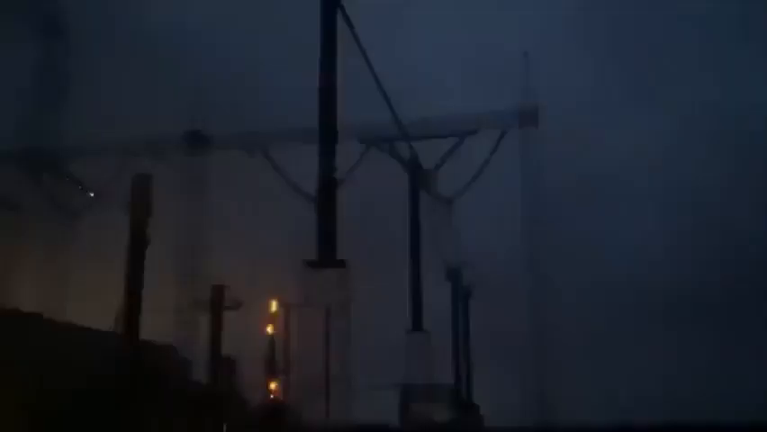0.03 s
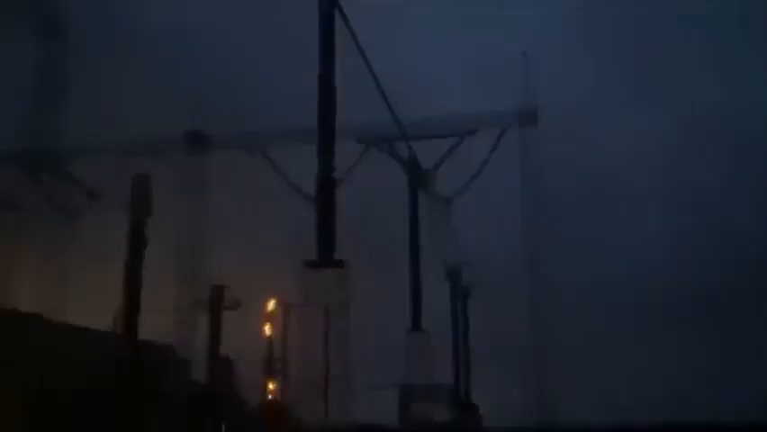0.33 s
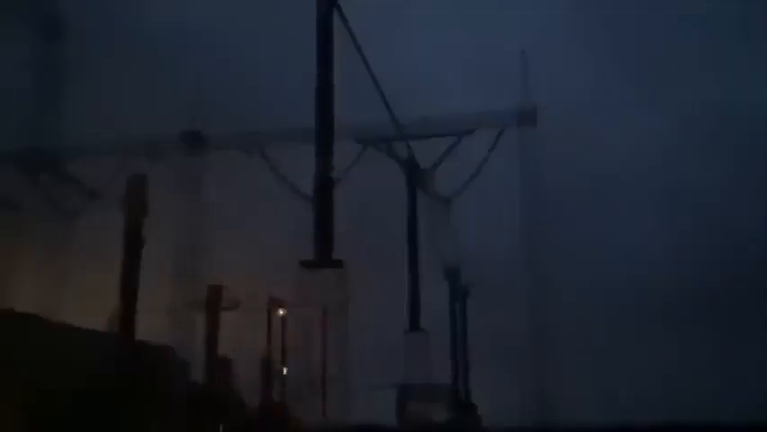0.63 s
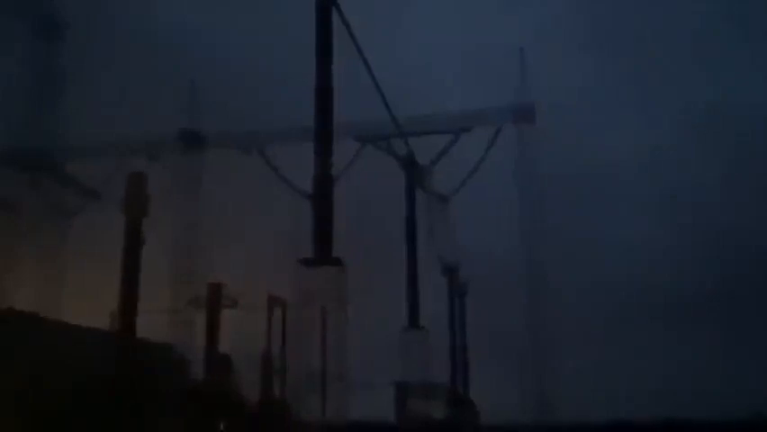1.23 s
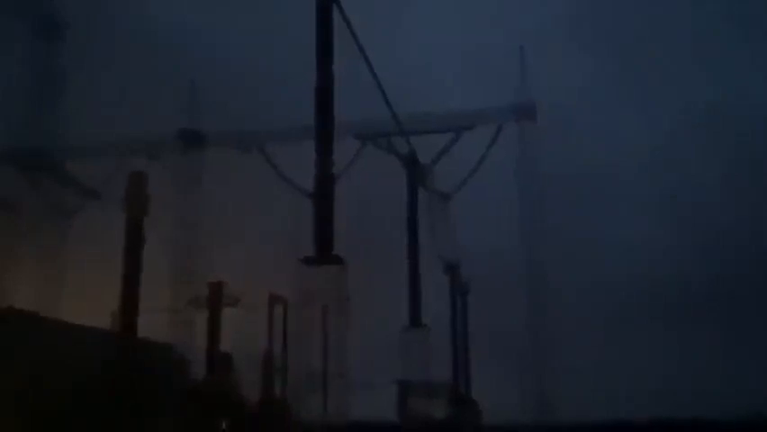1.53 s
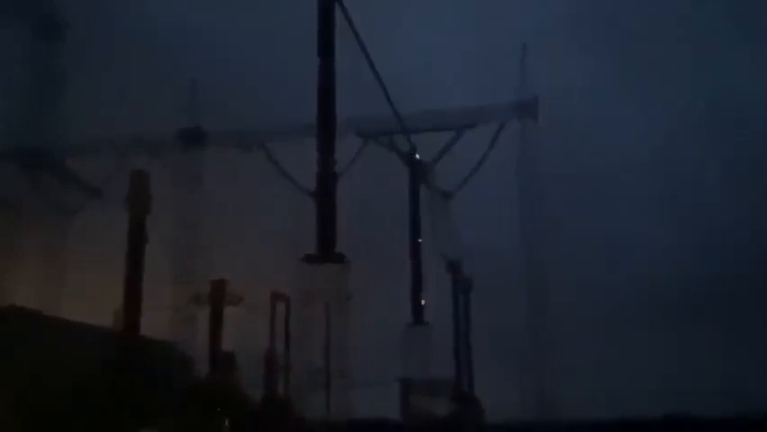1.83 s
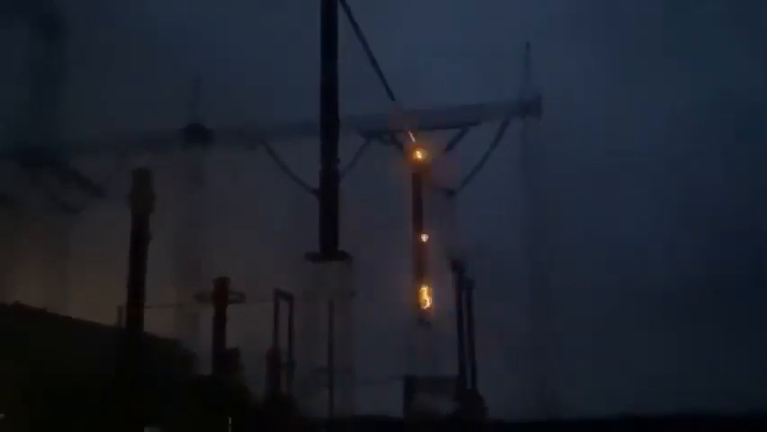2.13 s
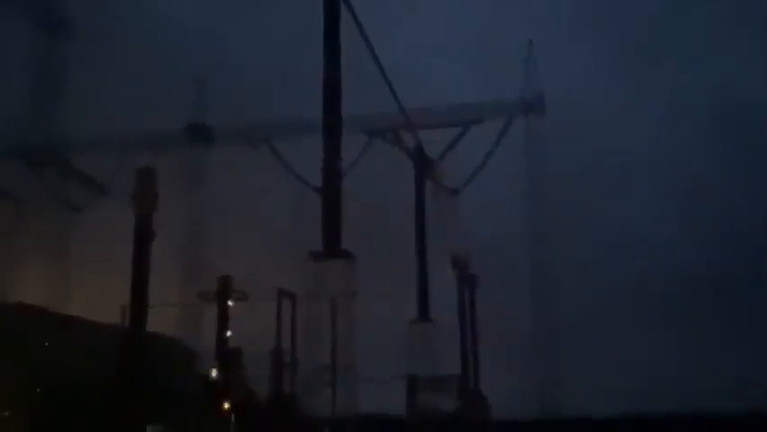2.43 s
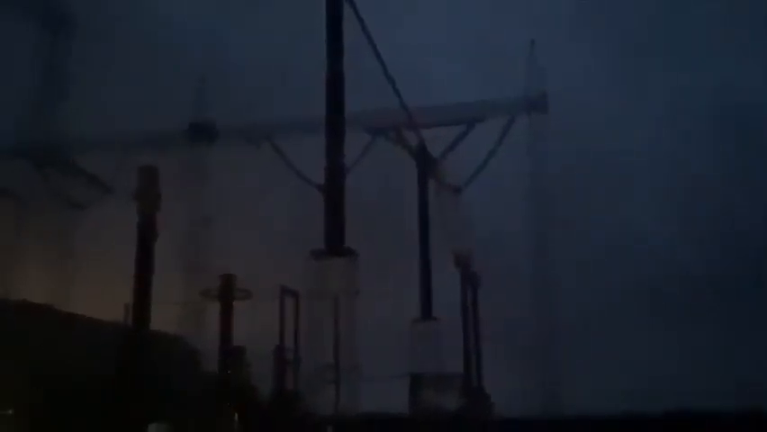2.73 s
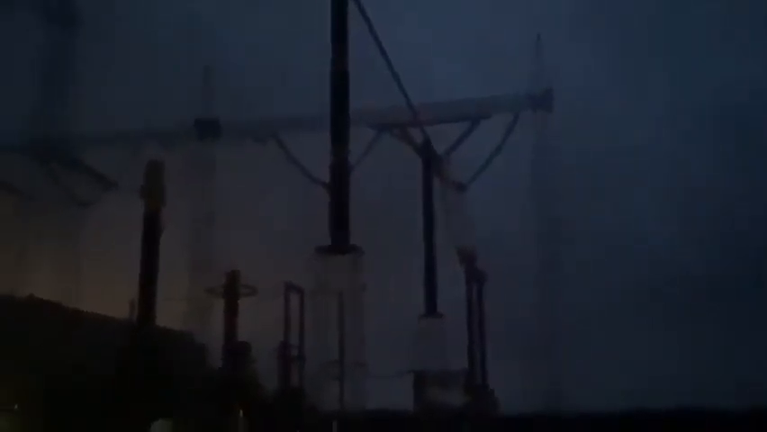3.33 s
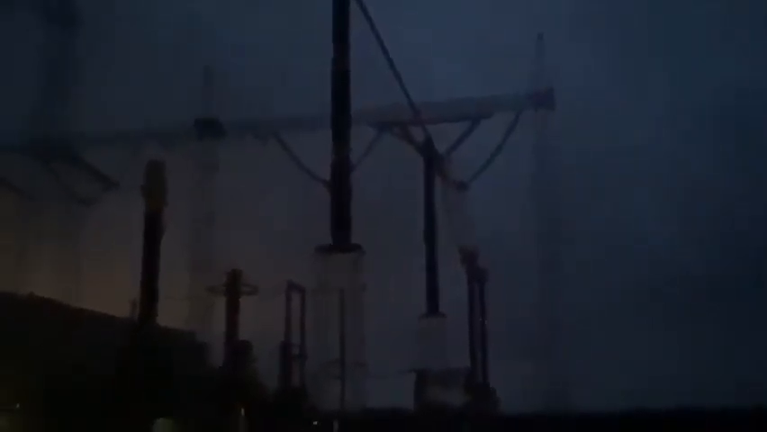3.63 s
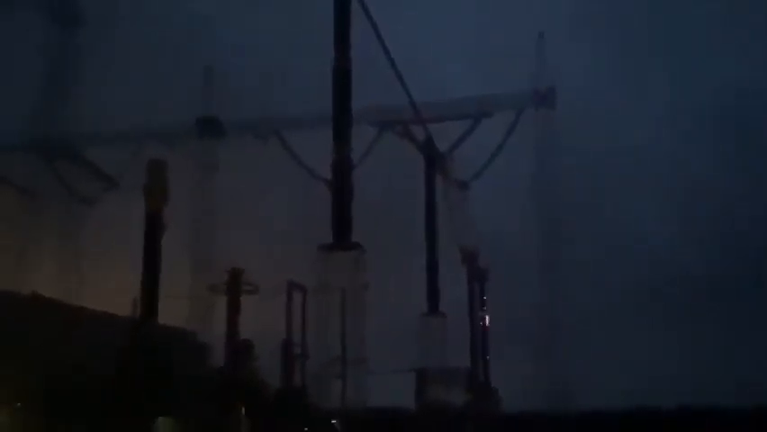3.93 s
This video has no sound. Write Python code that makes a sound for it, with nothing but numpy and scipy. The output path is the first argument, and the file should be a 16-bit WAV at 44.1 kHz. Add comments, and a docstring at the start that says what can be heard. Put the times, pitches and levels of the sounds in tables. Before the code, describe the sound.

High-voltage insulators sizzle and tick while transformers hum and the night air rumbles.

```python
"""Electrical discharges sizzle, tick and spit on the insulators of a high-voltage switchyard at night.
Each spark is an impulse: crowds of them merge into hiss, and quick runs set the fittings ringing.
Beneath them are the hum of transformers and cooling fans, a low rumble, a drone and distant traffic.
An instant of brighter, wider hiss comes first and breaks off; after a short silence the yard fades in."""
import sys
import numpy as np
from scipy import signal
from scipy.fft import rfft, irfft
from scipy.io import wavfile

SR = 44100
rng = np.random.default_rng(int(sys.argv[2]) if len(sys.argv) > 2 else 0)


def waveform_to_disk(signal):
    """Save audio, clipped to [-1, 1], as 16-bit WAV at the path in sys.argv[1]."""
    frames = np.transpose(np.atleast_2d(signal))
    scaled = np.clip(frames, -1, 1) * 32767
    samples = np.round(scaled).astype(np.int16)
    wavfile.write(sys.argv[1], SR, samples)


N = 176400
T = np.arange(N) / SR
HZ = np.fft.rfftfreq(N, 1 / SR)

# Envelope of the sizzle and ticks. Each row: time in seconds, relative level in dB.
SIZZLE_LEVEL = [(.15, -46.5), (.49, -46), (.53, -44.5), (.57, -47), (.93, -47.5), (1.15, -46), (1.46, -46),
                (1.52, -46), (1.97, -47), (2.1, -47.5), (2.23, -45), (2.31, -45.5), (2.34, -44),
                (2.37, -43.5), (2.4, -47.5), (2.5, -45.5), (3.1, -47.5), (3.36, -45.5), (3.47, -46.5),
                (3.57, -49), (3.65, -46), (4.0, -47)]


def amp(db):
    """Amplitude ratio: tenfold for every 20 dB."""
    return 10 ** (np.asarray(db) / 20)


def unit(x):
    """Normalisation to an rms of 1."""
    return x / np.sqrt(np.mean(abs(x) ** 2) + 1e-20)


def over_frequency(points):
    """Interpolation of (Hz, value) points over log frequency."""
    hz, value = np.transpose(points)
    return np.interp(np.log(HZ + 1), np.log(hz + 1), value)


def envelope(points):
    """Amplitude envelope through (seconds, dB) points."""
    return amp(np.interp(T, *np.transpose(points)))


def colour(x, spectrum):
    """Minimum-phase filtering: a causal response of unit power gain, shaped by (Hz, dB) points."""
    log_gain = np.log(unit(amp(over_frequency(spectrum))))
    cepstrum = irfft(log_gain, N)
    cepstrum[1:N // 2] *= 2
    cepstrum[N // 2 + 1:] = 0
    return irfft(rfft(x) * np.exp(rfft(cepstrum)), N)


def drift(rate_hz):
    """Random modulation: low-passed noise of rms 1."""
    return unit(irfft(rfft(rng.standard_normal(N)) * np.exp(-(HZ / rate_hz) ** 2), N))


def spread(pair, coherence):
    """Partial coherence: two independent signals mix into left and right; coherence is capped at 1."""
    same = np.clip(over_frequency(coherence), -1, 1)
    mid, side = rfft(pair) * np.sqrt([(1 + same) / 2, (1 - same) / 2])
    return irfft(np.array([mid + side, mid - side]), N)


def stereo_noise(coherence):
    """Partially coherent white noise, from (Hz, coherence) points."""
    return spread(rng.standard_normal((2, N)), coherence)


def low_pass(x, hz):
    """Steep band limiting by a windowed sinc."""
    kernel = signal.firwin(401, hz, window=("kaiser", 9), fs=SR)
    return signal.oaconvolve(x, kernel[None], "same")


def resonate(x, hz, width_hz):
    """A damped resonance of peak gain 1: the narrower, the longer it rings."""
    return signal.lfilter(*signal.iirpeak(hz, hz / width_hz, fs=SR), x)


def traffic():
    """Interchannel level and phase differences set distant traffic to one side; its tyre whine nears."""
    # Spectra of the wash and the whine. Each row: frequency in Hz, relative density in dB.
    wash_spectrum = [(150, -29.5), (300, -10), (430, 0.5), (580, -2.5), (750, -7), (950, -10), (1500, -9.5),
                     (1850, -15.5), (2200, -41), (4000, -67.5)]
    whine_spectrum = [(300, -59), (500, -32), (620, -5), (720, -12), (770, 1), (820, -9), (920, -15),
                      (1150, -35), (2000, -80)]
    # Their envelopes. Each row: time in seconds, relative level in dB.
    wash_level = [(.15, 0.35), (1.3, 0.033), (2.2, 0.62), (3, 0.17), (3.8, 0.88), (4, 1.1)]
    whine_level = [(0, -84), (1.5, -80), (2.7, -60), (3.3, -58.5), (3.8, -53.5), (4, -54.5)]
    # Stereo image. Each row: frequency in Hz, then coherence, left lead in radians or left excess in dB.
    coherence = [(300, 1.2), (500, 0.5), (720, 0.05), (950, 0.67), (1250, 1.3), (1800, 0.5)]
    left_lead = [(300, -0.4), (500, -1.35), (700, -3), (1000, -4), (1800, -4)]
    left_excess = [(250, 28), (450, 4), (750, 2.5), (1200, 0), (2000, -4.5)]
    pan = amp(over_frequency(left_excess) / 2) * np.exp(.5j * over_frequency(left_lead))
    placed = irfft(rfft(stereo_noise(coherence)) * np.array([pan, 1 / pan]), N)
    wash = unit(colour(placed, wash_spectrum))
    whine = unit(colour(stereo_noise(coherence), whine_spectrum))
    return amp(-47) * envelope(wash_level) * wash + envelope(whine_level) * whine


def low_noise(spectrum, left_lag_s=0.000474):
    """Path difference: deep noise from the right reaches the left a moment later."""
    # Likeness of left and right. Each row: frequency in Hz, coherence.
    coherence = [(20, 0.94), (45, 1), (75, 1), (140, 0.99), (220, 0.99), (340, 0.99), (600, 0.27)]
    bins = rfft(stereo_noise(coherence))
    bins[0] *= np.exp(-2j * np.pi * HZ * left_lag_s)
    return unit(colour(irfft(bins, N), spectrum))


def rumble(buffet_s=0.017):
    """Amplitude modulation of deep noise: an outdoor rumble swells and sinks, with short buffets."""
    # Rumble spectrum. Each row: frequency in Hz, relative density in dB.
    spectrum = [(15, -26.5), (24, -26), (36, -11), (50, -1.5), (70, 2), (90, -1.5), (125, -6.5), (165, -9),
                (230, -17), (310, -22.5), (360, -26), (500, -36), (900, -55.5), (2000, -83.5)]
    # Slow swell and brief buffets. Each row: time in seconds, gain in dB.
    swell = [(.15, -2), (.23, -1.5), (.33, 1), (.5, 0), (.7, 1.5), (1.2, 1.1), (1.6, -2.5), (1.92, -1.5),
             (2.15, 0), (2.45, -4), (2.58, 0), (3.1, -0.6), (3.8, 1.5)]
    buffets = [(.267, 4), (.372, 3.5), (.75, 3), (1.728, 7), (1.917, 4.5), (2.565, 5), (2.917, 6.5)]
    rise_db = sum(db * np.exp(-((T - s) / buffet_s) ** 2) for s, db in buffets)
    return amp(-30 + rise_db) * envelope(swell) * low_noise(spectrum)


def drone(give=2.2):
    """Envelope compression steadies a low band of noise into a drone; less give holds it firmer."""
    # Drone spectrum. Each row: frequency in Hz, relative density in dB.
    spectrum = [(50, -59.5), (80, -35.5), (100, -8), (112, 2.5), (128, 7), (145, -2), (170, -11),
                (220, -32), (400, -70), (900, -110)]
    # Its swell, greatest about halfway. Each row: time in seconds, level in dB.
    level = [(.15, -43), (.8, -42.5), (1.4, -41.5), (1.7, -38), (1.9, -39), (2.1, -33.5), (2.55, -37.5),
             (2.9, -36.5), (3.25, -39.5), (3.55, -35), (3.8, -46), (4, -37)]
    analytic = signal.hilbert(low_noise(spectrum))
    power = np.mean(abs(analytic) ** 2, axis=0)
    return envelope(level) * unit(analytic.real / np.sqrt(give + power))


def tones(partials, waver, rate_hz, air_delay_s=0.00021):
    """Phase modulation: moving air varies the travel time of wavering tones, shaking high ones most."""
    out = np.zeros((2, N))
    for hz, db, left_db, lead in partials:
        wavering = unit(1 + waver * (drift(rate_hz) + 1j * drift(rate_hz)))
        arrival = T + air_delay_s * drift(rate_hz=13.7)
        tone = np.sqrt(2) * amp(db) * wavering * np.exp(2j * np.pi * hz * arrival)
        pan = amp(left_db / 2) * np.exp(.5j * lead)
        out += np.array([tone * pan, tone / pan]).real
    return out


def fans():
    """Tonal noise of rotation: cooling fans give slowly wavering partials."""
    # Fan tones. Each row: frequency in Hz, level in dB, left excess in dB, left lead in radians.
    partials = [(124.1, -50, 3, -.4), (192, -48, 2.5, -0.48), (288.4, -52.5, 3.5, -0.91),
                (303, -47, -0.5, -0.57), (318.3, -58.5, 0, -.7), (319.4, -56, 10, -0.43),
                (422.3, -61.5, 5.5, -0.87)]
    return tones(partials, waver=0.32, rate_hz=2.1)


def transformers():
    """Harmonic vibration: transformers hum near multiples of twice the mains frequency."""
    # Hum. Each row: frequency in Hz, relative level in dB, left excess in dB, left lead in radians.
    partials = [(100.23, -36.5, -0.5, -0.77), (200.2, -54, 5, -1.4), (300.3, -51.5, 4, -1.3),
                (604.4, -53, 0.5, 2), (1199.5, -61, -1, 2)]
    # Its envelope. Each row: time in seconds, gain in dB.
    level = [(.15, -7), (.4, 0), (.58, -8), (.82, -0.5), (1.5, 0.5), (2.2, 1), (2.6, 2.5), (3, 2.5), (4, 0)]
    return envelope(level) * tones(partials, waver=.42, rate_hz=6.8)


def opening_hiss(end_s=0.063, decay_db_per_s=800):
    """Gated noise: an instant of hiss and rumble, wide through its low coherence, stops dead."""
    # Hiss spectrum. Each row: frequency in Hz, relative density in dB.
    spectrum = [(25, -5), (50, 6), (120, -5), (260, -16.5), (350, -19.5), (520, -15), (850, -23.5),
                (1700, -18.5), (2600, -28.5), (4150, -21.5), (5200, -30.5), (15000, -29.5)]
    hiss = unit(colour(stereo_noise([(100, 0.47), (3000, 0.091)]), spectrum))
    tail = amp(-12 - decay_db_per_s * np.maximum(T - end_s, 0))
    return amp(-30) * hiss * np.where(T < end_s, 1, tail)


def flicker(x, patch_s=0.0074, patch_hz=280):
    """Random spectral modulation: patches of the spectrum come and go, most in the high treble."""
    # Flicker depth. Each row: frequency in Hz, typical swing in dB.
    depth = [(1000, 4.5), (2500, 1.55), (7000, 2.5), (8800, 6), (11500, 7)]
    hz, t, frames = signal.stft(x, SR, nperseg=512, noverlap=384)
    per_hz = np.fft.fftfreq(len(hz), hz[1])[:, None]
    per_s = np.fft.fftfreq(len(t), t[1])
    blur = np.exp(-2 * np.pi ** 2 * ((per_hz * patch_hz) ** 2 + (per_s * patch_s) ** 2))
    patches = unit(np.fft.ifft2(np.fft.fft2(rng.standard_normal(blur.shape)) * blur).real)
    gain = amp(np.interp(hz, *np.transpose(depth))[:, None] * np.minimum(patches, 1.6))
    gain /= np.sqrt(np.mean(gain ** 2, axis=1, keepdims=True))  # each band keeps its mean power
    return signal.istft(frames * gain, SR, nperseg=512, noverlap=384)[1][:, :N]


def sizzle(flares_per_s=140, flare_s=0.0045, clicks_per_s=1800):
    """Superposition: countless tiny discharges sum to hiss and crackle, with slight, brief flares."""
    # Sizzle spectrum. Each row: frequency in Hz, relative density in dB.
    spectrum = [(300, -14), (800, -3), (1500, -3.5), (2100, 0.5), (2550, -1.5), (2820, 0), (3100, -2.5),
                (4000, -1), (5300, -4), (7200, -3.5), (8700, -6), (10300, -5.5), (11500, -11.5)]
    # Likeness of left and right. Each row: frequency in Hz, coherence.
    coherence = [(1000, 0.68), (1700, 0.3), (2150, 1), (4000, 1), (4400, 0.8), (7000, 0.62), (9000, 0.3),
                 (12000, 0.4)]
    starts = (rng.random(N) < flares_per_s / SR) * np.minimum(rng.exponential(1, N), 2.5)
    flares = signal.oaconvolve(starts, np.hanning(int(flare_s * SR)), "same")
    activity = unit(1 + 0.045 * flares)
    sizes = amp(3.5 * np.minimum(rng.exponential(1, (2, N)), 4))
    clicks = sizes * (rng.random((2, N)) < clicks_per_s / SR) * rng.choice([-1, 1], (2, N))
    hiss = amp(-1) * rng.standard_normal((2, N))
    crackle = amp(-4.5) * unit(clicks)
    discharges = spread((hiss + crackle) * activity, coherence)
    return colour(discharges, spectrum) * envelope(SIZZLE_LEVEL)


def ticks(ticks_per_s=260):
    """A Poisson process: tiny separate discharges fall at random, each ringing briefly at one pitch."""
    out = np.zeros(N)
    pitches_hz = np.geomspace(1708, 7264, 30)
    for hz in pitches_hz:
        clicks = rng.random(N) < ticks_per_s / len(pitches_hz) / SR
        out += resonate(clicks.astype(float), hz, width_hz=80)
    return amp(-10.5) * unit(out) * envelope(SIZZLE_LEVEL)


def ring(x, hz, emphasis_db=11):
    """A heavily damped resonance, added to the direct sound, gives a spark its pitch."""
    gain = amp(emphasis_db / 2)
    return x / gain + gain * resonate(x, hz, width_hz=760)


def sparks(restrike_hz=939, jitter=.25):
    """Impulse excitation: larger discharges snap once, or re-strike in spits that ring the fittings."""
    # Single sparks. Each row: start in seconds, relative level in dB, ring in Hz.
    snaps = [(.5163, -14.5, 2770), (1.0885, -30, 4500), (1.0972, -22, 4000), (1.4955, -15.5, 2630),
             (2.0626, -17, 1990)]
    # Runs of sparks. Each row: middle and length in seconds, relative level in dB, ring in Hz,
    # gain of the fittings' modes.
    spits = [(0.326, .012, -44, 6600, 0), (0.52, .006, -39, 4300, 0.22), (0.619, 0.0083, -50, 2300, 0.86),
             (0.864, .015, -43.5, 4200, .3), (1.096, 0.021, -40, 4300, 0),
             (1.348, 0.011, -44.5, 6100, 0.39), (1.534, 0.016, -47, 6800, 0.43),
             (1.592, 0.011, -44, 6400, .2), (1.744, .02, -42.5, 5800, 0.081), (1.823, 0.017, -45, 7000, 0),
             (1.843, 0.016, -43, 5200, 0), (1.91, 0.05, -45.5, 3780, .4), (2.014, .01, -45.5, 2200, 0.57),
             (2.048, 0.014, -45, 6750, 0), (2.065, .0089, -41, 3000, 0.061),
             (2.115, 0.012, -44.5, 6100, 0.34), (2.292, 0.068, -53.5, 2200, 1.2),
             (2.3253, .012, -39.5, 1990, 0.84), (2.364, 0.012, -35.5, 4500, 0.14),
             (2.478, 0.011, -44, 5000, 0.28), (2.658, .014, -45, 6000, 0), (2.84, 0.025, -47, 5900, 0.23),
             (3.038, .018, -44, 3320, 0.36), (3.137, 0.044, -47.5, 2300, 0.58),
             (3.394, 0.024, -44.5, 3500, 0.19), (3.451, 0.029, -44.5, 3840, 0.31),
             (3.653, .016, -40.5, 5800, 0.19)]
    # Modes of the fittings. Each row: frequency in Hz, bandwidth in Hz, relative level in dB.
    fittings = [(2020, 120, -4.5), (2800, 94, 3.5), (3840, 110, -8), (5430, 180, -13)]
    # Spark spectrum. Each row: frequency in Hz, relative gain in dB.
    spectrum = [(200, -8), (600, 9.5), (1400, -1), (2800, -3), (3600, -3.5), (5700, -1.5), (7500, 0.5),
                (8700, -15), (11500, -18)]
    out = np.zeros(N)
    for start, db, hz in snaps:
        out += amp(db) * ring(signal.unit_impulse(N, round(start * SR)), hz)
    cycles = np.cumsum(restrike_hz * (1 + jitter * drift(rate_hz=400))) / SR
    pulses = np.diff(np.floor(cycles), prepend=0)  # one strike a cycle
    strikes = unit(pulses * (1 + 0.21 * rng.standard_normal(N)))
    fizzing = unit(strikes + rng.standard_normal(N))
    for middle, length, db, hz, fitting_gain in spits:
        near = abs(T - middle) < length + .02  # room for the ringing to decay
        burst = fizzing[near] * np.cos(np.pi * np.clip((T[near] - middle) / length, -.5, .5))
        modes = unit(sum(amp(mode_db) * unit(resonate(burst, mode_hz, width))
                         for mode_hz, width, mode_db in fittings))
        out[near] += amp(db) * (ring(burst, hz) + fitting_gain * burst.std() * modes)
    return colour(out, spectrum)


def scene():
    """Linear superposition: the yard's sources add, and fade in after the opening hiss."""
    # Fade-in of the yard. Each row: time in seconds, gain in dB.
    fade_in = [(.085, -72), (.108, -34), (.12, -14.5), (.132, 0.5), (.142, 2)]
    machines = transformers() + fans()
    background = rumble() + drone() + traffic() + machines
    yard = background + flicker(sizzle()) + ticks() + sparks()
    return opening_hiss() + low_pass(yard, hz=11800) * envelope(fade_in)


def record(dry):
    """Band limiting removes the highest treble."""
    return low_pass(dry, hz=15700)


dry = scene()
out = record(dry)
waveform_to_disk(out)
```